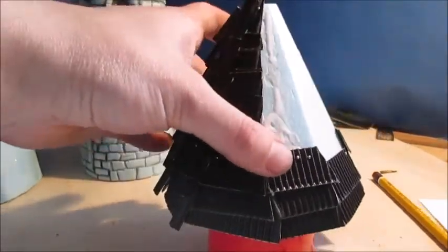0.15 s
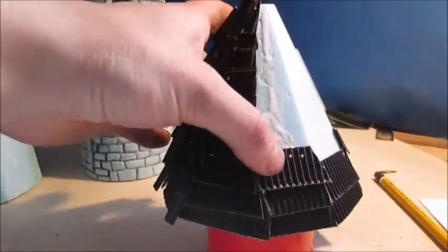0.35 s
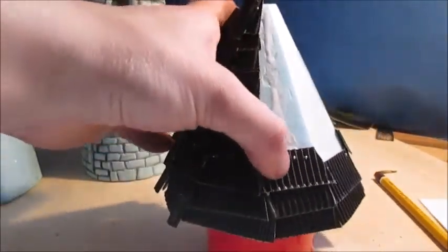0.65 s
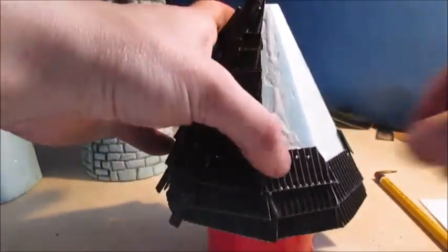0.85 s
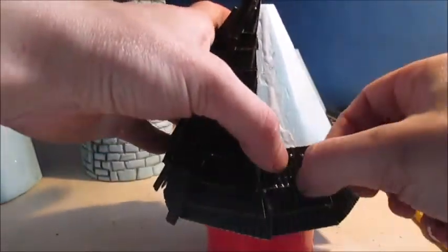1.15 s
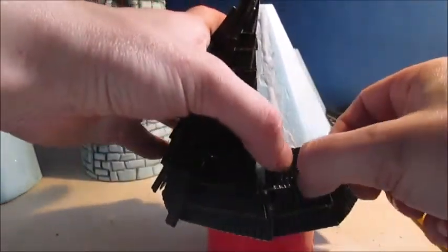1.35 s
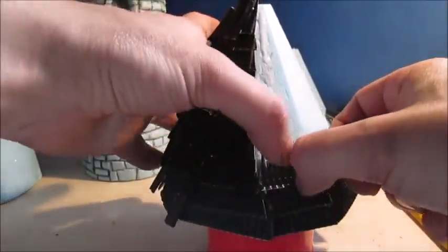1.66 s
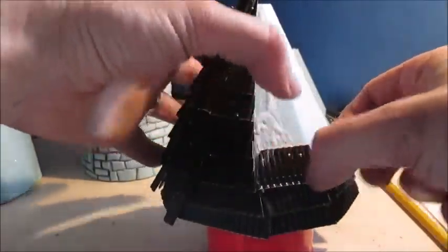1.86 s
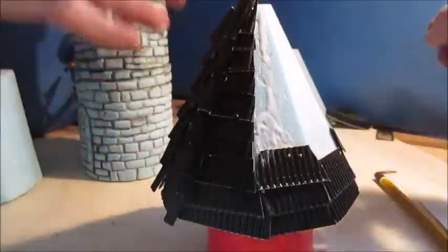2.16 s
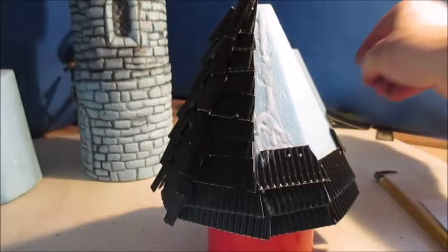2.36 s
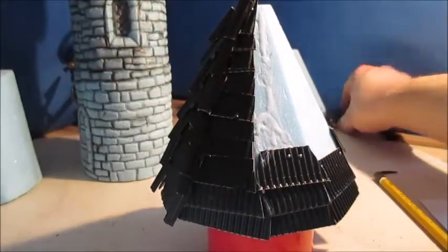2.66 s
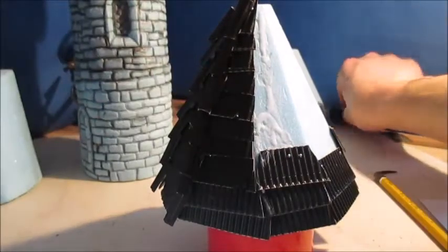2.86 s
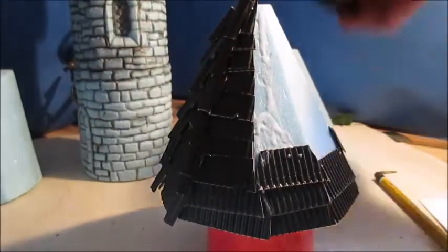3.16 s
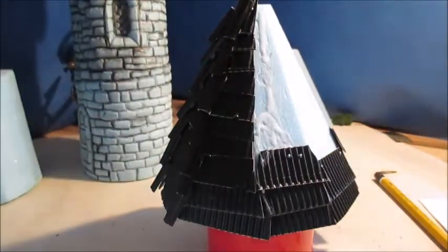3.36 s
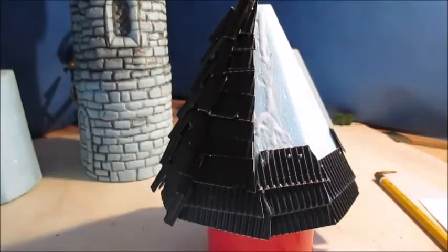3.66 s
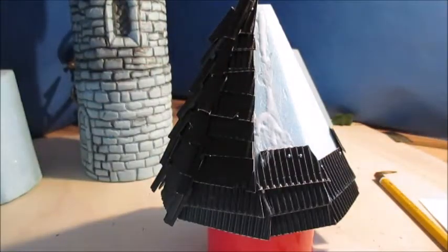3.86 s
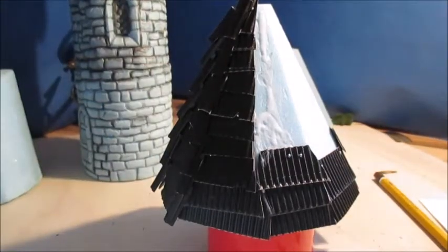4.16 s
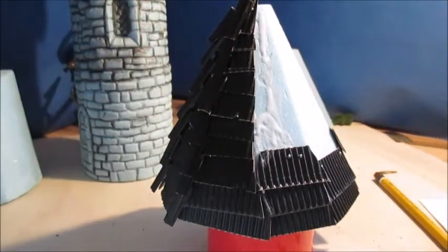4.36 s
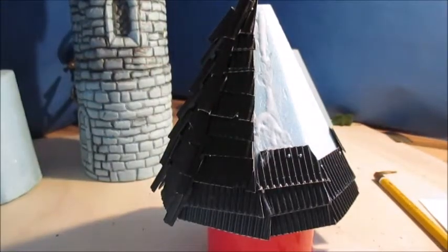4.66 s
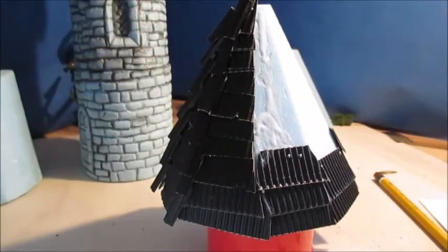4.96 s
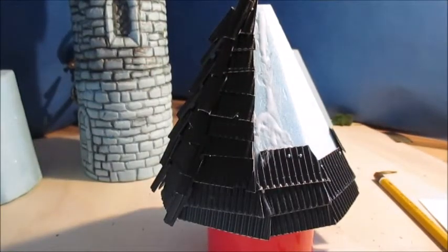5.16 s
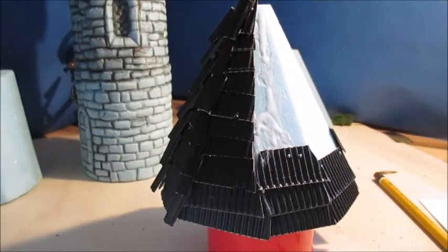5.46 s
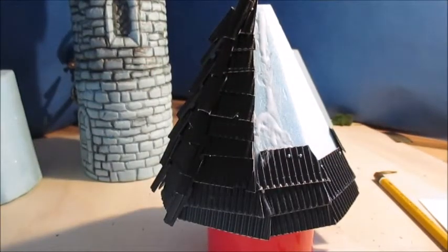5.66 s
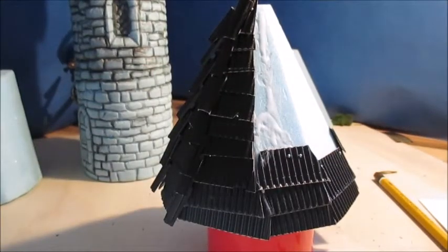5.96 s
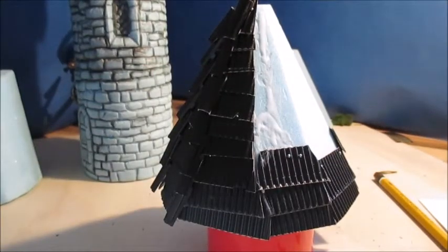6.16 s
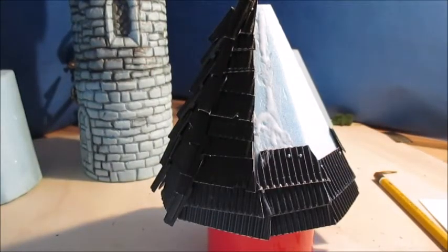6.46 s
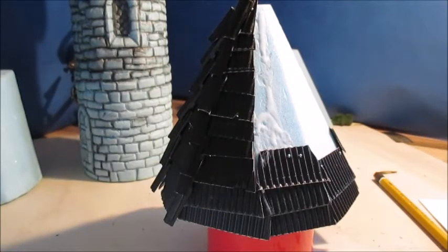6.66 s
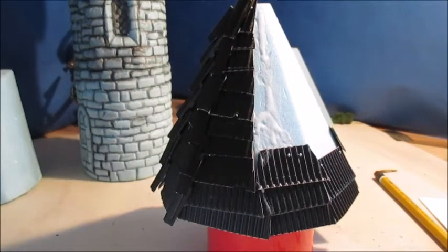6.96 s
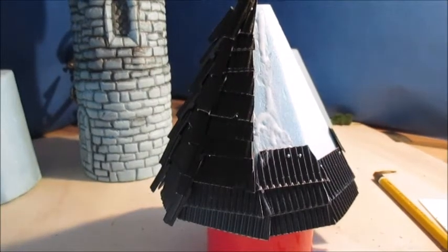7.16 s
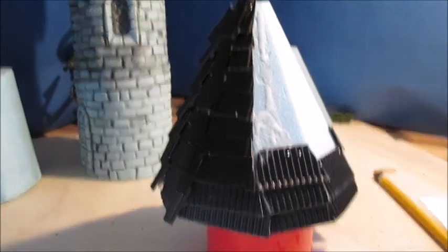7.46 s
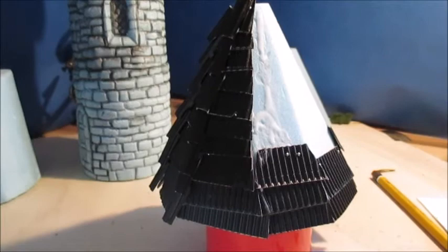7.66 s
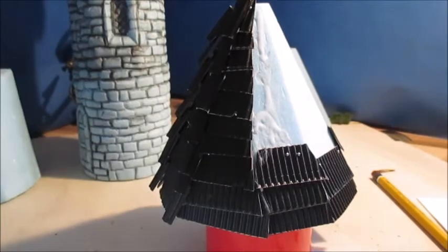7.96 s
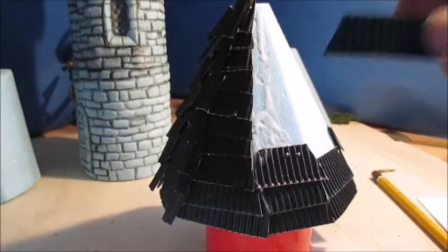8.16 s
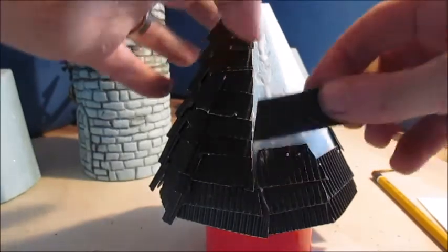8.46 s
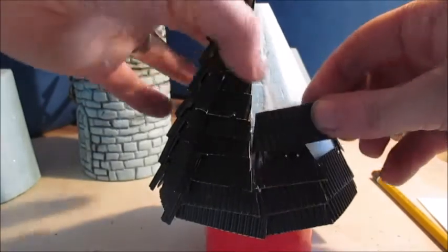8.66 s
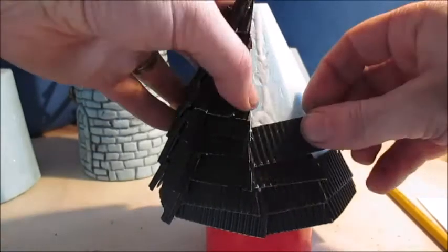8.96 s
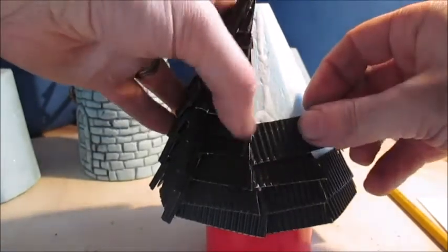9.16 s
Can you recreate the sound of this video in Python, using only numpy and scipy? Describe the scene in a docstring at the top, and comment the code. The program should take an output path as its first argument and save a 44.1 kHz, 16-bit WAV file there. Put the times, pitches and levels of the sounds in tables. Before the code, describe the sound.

A cardboard model roof is handled close by on a wooden table in a small room, over steady low hum and room noise. In the first second, small things knock and scuff on the table, with light clicks. At 1.6 seconds a pressed card shingle snaps onto the hollow roof with a short, loud pop. A cluster of knocks and rustles comes from 2.5 to 2.9 seconds, then sharp clicks around 3.6. More knocks, clicks and rustles run from 4 to 4.5 seconds, followed by a soft, dull half-second slide over the tabletop. Faint ticks and tiny card creaks lead to sharp clicks at about 6.5 seconds. A last bunch of hard knocks and scrapes falls between 6.9 and 7.5 seconds, and the volume dips briefly after the hardest blows. Light clicks and faint handling continue until just after 9 seconds.

```python
"""A cardboard and foam model roof is handled on a wooden work table in a small room.
First things knock on the table; at 1.6 s a pressed card shingle snaps onto the hollow roof with a pop.
More knocks, clicks and rustles follow, then at 4.5 s something slides softly over the table top.
Card creaks and clicks, a last bunch of knocks comes at 7-7.5 s, and faint handling ends the scene.
Mains hum and room noise lie below throughout; the volume ducks after the hardest blows."""
import sys
import numpy as np
from scipy import signal
from scipy.fft import rfft, irfft
from scipy.io import wavfile

SR = 44100
rng = np.random.default_rng(int(sys.argv[2]) if len(sys.argv) > 2 else 0)


def unload_audio(sound):
    """Save the sound as a 16-bit wav file, at the path given as the first command line argument."""
    columns = np.transpose(np.atleast_2d(sound))
    # keep every value between -1 and 1, then stretch to whole-number steps
    steps = np.round(np.clip(columns, -1, 1) * 32767)
    wavfile.write(sys.argv[1], SR, steps.astype(np.int16))


N = 410571
LENGTH, LEAD = 16384, 400  # samples in one sound, and in the crackle just before a contact
AGE = np.arange(LENGTH) / SR  # seconds since a sound began
FREQS = np.arange(LENGTH // 2 + 1) * SR / LENGTH
# A sound's tone is five levels in dB: thump, body, clack, edge and crack. These are their pitches in Hz.
TONE_HZ = [140, 600, 1500, 3400, 8000]

# An ordinary knock's tone, thump to crack, in dB.
KNOCK_TONE = [-5.5, 1, -4, -14, -29.5]
# What each dB of hardness adds to those five levels: mostly edge and crack.
HARD_SHARE = [0.028, 0.013, 0.29, 0.91, 1]
# What each dB of heaviness adds: more thump, less clack.
HEAVY_SHARE = [0.93, -0.032, -0.27, -0.028, -0.15]
# The table top's notes. Each row: pitch in Hz, level in dB, ring time in seconds.
TABLE_NOTES = [(84, 2, .2), (138, -3, .18), (228, -4, .14), (260, -3, .15), (464, -4, .11), (533, -2, .11),
               (620, -6, .06), (743, -2, .07), (927, -2, .07), (1001, -3, .06), (1162, -4, .09),
               (1248, -4, .09), (1381, -4, .07), (1672, -5, .07), (1729, -5, .09), (1851, -5, .08)]
# Each row: start in seconds, level in dB, hardness in dB, heaviness in dB, scuff in seconds,
# the thing's own pitch in Hz, boost at that pitch in dB, echo level in dB.
KNOCKS = [(0.093, 9, -7, 1, 0.0015, 1660, 11.5, 1), (0.165, -8.5, -15, 12, 0.0066, 1500, 12.5, -0.5),
          (0.3152, 0, 6, 18, 0.0013, 1920, 14.5, 0), (0.376, 10, -12, -9, 0.0036, 1100, 7, -0.5),
          (0.3973, 14, -15.5, 4, 0.0075, 282, 6, 0.5), (0.6255, -1.5, 4.5, 15, 0.0069, 805, 8, 1.5),
          (0.7125, 22, -12.5, -7, 0.002, 2720, 10, 0.5), (0.7412, 4.5, 0, 3, 0.002, 2950, 20.5, 2.5),
          (0.7517, 16.5, -22, 3.5, 0.0024, 1020, 11.5, 0), (0.818, 3.5, -3, 0, 0.002, 2800, 7.5, -6),
          (2.547, 12.5, -8, -2, 0.0034, 2700, 7.5, -3), (2.593, 4.5, 2, 3.5, 0.0098, 2000, 8, 6),
          (2.635, 5, -19, 7, 0.0021, 497, 12, -4), (2.655, 3, -0.5, -1, 0.0045, 3050, 7.5, 3),
          (2.7305, 11, -6, 1, 0.0064, 2330, 13.5, -2), (2.7378, 15.5, -10, -4, 0.002, 920, 4, 1),
          (2.766, 7.5, 1, -2, 0.0046, 4300, 10.5, 1.5), (2.796, 7, -6, 4, 0.0058, 2390, 11, -4),
          (2.828, 5.5, -8, 8.5, 0.0046, 380, 7.5, -3.5), (4.0343, 13.5, -11, 4.5, 0.0031, 812, 8, 3),
          (4.0487, 4.5, 0, 11, 0.0024, 550, 9.5, 12), (4.0657, 14, 7, -16, 0.0012, 4000, 13.5, -2.5),
          (4.069, 20.5, 4.5, 0.5, 0.002, 1150, 7, -2.5), (4.345, 1.5, -27, -2, 0.0043, 510, 10, -5),
          (4.356, 5, -24, -1, 0.0016, 580, 7, -3), (4.38, 1.5, 0, -3, 0.003, 2490, 14, 1),
          (4.4394, 7.5, -6, 5, 0.0019, 1660, 9, 0.5), (4.4635, 3.5, -15, -1, 0.0018, 680, 10, -4),
          (6.5293, 5.5, -17, -30, 0.00068, 686, 9, -10), (6.893, -5.5, -11, 14, 0.0047, 900, 2.5, 0),
          (7.0115, -5, 5.5, 7, 0.002, 7800, 25.5, -11), (7.018, 11, -14, -5.5, 0.0035, 3600, -8, 10),
          (7.0223, 15, -4.5, -16, 0.0029, 6540, 19, -8), (7.053, -10.5, 12, 35, 0.0024, 7500, 15, -4),
          (7.2109, 10.5, -17.5, -1, 0.0052, 676, -11, 0.5), (7.4429, 17, -11, -47, 0.0012, 1410, 7, 1.5),
          (7.463, 26, -1, -6, 0.0023, 825, 6, -7.5), (7.476, 16.5, 0, -1, 0.0036, 3300, 6.5, 3.5),
          (7.4938, 17.5, 0.5, -5, 0.0034, 1460, 2, -1.5)]

def knocks():
    """Things scuff the table, bump it and bounce once. Gives the direct sound and the part that echoes."""
    direct, to_room = np.zeros(N), np.zeros(N)
    for start, db, hard_db, heavy_db, scuff_s, own_hz, boost_db, echo_db in KNOCKS:
        tone = np.array(KNOCK_TONE) + db + hard_db * np.array(HARD_SHARE)
        tone += heavy_db * np.array(HEAVY_SHARE)
        bounce_delay = round(0.007 * SR * rng.uniform(.6, 1.4))
        drag = scuff_s / 0.0031  # a longer scuff chatters louder and longer
        hit, bounce = [blow(TABLE_NOTES, ring_db=-43, click_hz=3070, chatter_db=5.5 + 10 * np.log10(drag),
                            rise_s=scuff_s, fade_s=0.02 * drag) for _ in range(2)]
        contact = hit + from_db(-7.5) * np.pad(bounce, (bounce_delay, 0))[:LENGTH]
        contact = resonate(contact, hz=340, db=-0.5, q=1.9)  # the table is weak between thump and body
        contact = resonate(contact, own_hz, boost_db, q=4)
        sound = from_db(-4.5) * shape_tone(contact, tone, sub_db=-20, top_db=-31 + 0.59 * hard_db,
                                           ripple=0.19)
        sound = crackle_before(sound, db=-18, rise_s=0.0043)
        add(direct, start - LEAD / SR, sound)
        add(to_room, start - LEAD / SR, from_db(echo_db) * sound)
    return direct, to_room

# The hollow roof's notes. Each row: pitch in Hz, level in dB, ring time in seconds.
ROOF_NOTES = [(365, -13, .09), (452, -11, .06), (540, 0, .03), (615, 5, .027), (700, 2, .024),
              (830, -2, .028), (960, -1, .028), (1240, -7, .04), (2825, -3, .015), (3750, -1, .015),
              (4130, 5, .014), (4500, 4, .014), (5320, 6, .012), (9100, 4, .012)]
# Each row: start in seconds, then thump, body, clack, edge and crack in dB.
SNAPS = [(1.5917, 6, 28.5, 13, 18.5, 14)]

def shingle_snap():
    """A pressed shingle springs onto the roof, whose hollow cone gives a short pop."""
    out = np.zeros(N)
    for start, *tone in SNAPS:
        contact = blow(ROOF_NOTES, ring_db=-32.5, click_hz=9000, chatter_db=5, rise_s=0.0009, fade_s=0.02)
        sound = from_db(-11.5) * shape_tone(contact, tone, sub_db=-21, top_db=-24, ripple=0.074)
        add(out, start - LEAD / SR, crackle_before(sound, db=-21, rise_s=0.0086))
    return out

# An ordinary click's tone, thump to crack, in dB.
CLICK_TONE = [-5, -3, 0, -4, -4.5]
# Loose card's notes. Each row: pitch in Hz, level in dB, ring time in seconds.
CARD_NOTES = [(760, -2, .03), (1250, -3, .03), (1700, -2, .025), (3600, -3, .015), (5300, 2, .012),
              (7300, 2, .012), (9300, 4, .012)]
# Each row: start in seconds, level in dB, brightness in dB per octave, echo level in dB,
# the thing's own pitch in Hz, boost at that pitch in dB (a dip if negative).
CLICKS = [(0.1995, -21, -2, -8, 9000, 6), (0.2105, -19, -0.5, -6, 10000, 10),
          (0.3165, -14, -3, -4, 6500, 11), (0.6235, -10.5, 1.5, -9, 6100, 8.5),
          (0.7128, -6, -5, 1, 6200, 21), (0.7415, -12, -5.5, 2, 5200, 16),
          (0.7625, -11.5, -3, -6, 6600, 13.5), (0.903, -9, -5, -1, 9500, 9.5),
          (1.435, -23, -0.5, -5, 4000, 4), (2.785, -1.5, -3.5, 4, 8500, 0), (3.5036, -2, -3, -5.5, 1500, 3),
          (3.598, -12, -3, -2.5, 3000, 7), (3.7228, -0.5, -3.5, -5, 1500, -3),
          (4.053, -8.5, 3.5, 0, 10600, -2), (4.0615, -11, -2.5, -5, 10000, 1),
          (4.1455, -10, -5, -3, 7600, 18), (4.249, -16.5, -1.5, -4, 8800, 20),
          (4.3332, -8.5, -2, 4.5, 2520, 8), (4.3815, -9, -6, 1.5, 4600, 21.5),
          (5.0195, -22.5, -5, -1, 2430, 21.5), (6.0975, -11, 6, 2.5, 2450, 6.5),
          (6.4436, 8, 0.5, -3, 4340, -14), (6.4624, 4, -1.5, -26, 4000, -14), (6.5043, -3, 2, -4, 2500, 7),
          (6.527, -6, 1, -8, 2220, 13), (6.5296, 3, 2.4, -5.5, 2500, 5), (7.3112, -3, -5, -13, 9600, 9),
          (7.464, 1.5, -1.5, -1, 9630, 10), (7.8728, -10, -5, -9.5, 9400, 8.5),
          (7.878, 1.5, -1.5, -12, 10800, 11.5), (8.0478, -21.5, 2.5, -14, 9000, 9),
          (8.2233, -12, -2.5, -13, 4000, -3), (8.583, -31, -2, -10, 3000, 17),
          (8.684, -18, -2, 5.5, 8500, 5.5), (8.79, -17.5, 0, 0, 6000, -2.5),
          (8.869, -19, -2.5, -7, 2540, 14), (9.192, -25.5, -2.5, -8, 5600, 17.5)]

def card_clicks():
    """Card and small tools click sharply. Gives the direct sound and the part that echoes."""
    direct, to_room = np.zeros(N), np.zeros(N)
    for start, db, brightness, echo_db, own_hz, boost_db in CLICKS:
        tone = tilt(CLICK_TONE, db, brightness)
        contact = blow(CARD_NOTES, ring_db=-58.5, click_hz=14700, chatter_db=-1.5,
                       rise_s=0.00028, fade_s=0.019)
        # the walls get the click from all its sides, so theirs starts as a plain pulse
        pulse = from_db(echo_db + 3.5) * signal.unit_impulse(LENGTH)
        for track, source in (direct, contact), (to_room, pulse):
            sound = from_db(-3.5) * shape_tone(source, tone, sub_db=-27, top_db=-14, ripple=0.84)
            sound = resonate(sound, own_hz, boost_db, q=3)
            add(track, start - LEAD / SR, crackle_before(sound, db=-5, rise_s=0.00051))
    return direct, to_room

# An ordinary rustle's tone, thump to crack, in dB.
RUSTLE_TONE = [-5, 1, -2, -11.5, -14.5]
# Each row: start, end and swell time in seconds, level in dB, brightness in dB per octave,
# highest treble in dB compared with the crack.
RUSTLES = [(0.165, 0.172, 0.0027, -47, 5, -10), (0.208, 0.24, 0.0025, -43.5, 4, -8),
           (0.303, 0.335, 0.0095, -26, -2.5, -20), (0.567, 0.61, .008, -40, -0.5, -20),
           (0.617, 0.627, .004, -29.5, 0, -5), (0.688, 0.73, .01, -45, -2, -20),
           (0.99, 1.06, 0.012, -38, -2, -22), (2.54, 2.605, 0.0067, -25, 0, -19),
           (2.592, 2.72, 0.0037, -29.5, -3.5, -14), (2.74, 2.865, 0.0055, -32, -0.5, -26),
           (3.22, 3.25, 0.0063, -45, 5, -6), (3.35, 3.37, .004, -45, 2, -21),
           (3.492, 3.505, .004, -43.5, 9, -18), (3.66, 3.69, .008, -47, 5, -12),
           (4.079, 4.17, .004, -26.5, -1.2, -37), (4.241, 4.305, 0.0047, -29, -0.7, -7),
           (4.331, 4.385, .004, -29, -3.5, -17), (4.44, 4.47, .004, -26.5, -2.2, -24),
           (4.855, 4.88, 0.011, -50, 3.5, -22), (5.009, 5.035, .008, -40.5, 4, -14),
           (5.385, 5.425, 0.0039, -45, 2, -22), (5.731, 5.742, 0.0026, -45, 5.5, -30),
           (5.768, 5.79, .004, -48, 6, -25), (6.073, 6.1, 0.0062, -43, 4, -26),
           (6.225, 6.236, .004, -45.5, 2.5, -24), (6.881, 6.925, .02, -30.5, -0.7, -22),
           (7.015, 7.058, 0.0067, -21.5, 1.9, -19), (7.14, 7.18, 0.0031, -36.5, 1.5, -4),
           (7.24, 7.312, 0.053, -35, 0, -13), (7.382, 7.44, 0.029, -28.5, -4, -28),
           (7.413, 7.475, .03, -23.5, -4, -22), (7.96, 7.982, 0.014, -43, 4, -7),
           (8.135, 8.158, 0.012, -44, 6, -21), (8.816, 8.838, .008, -44, 3, -24.5)]

def rustles():
    """Rough surfaces catch and slip: tiny crackles over a fine hiss swell with each stroke."""
    out = np.zeros(N)
    for start, end, swell_s, db, brightness, top_db in RUSTLES:
        swell = np.clip(AGE / swell_s, 0, 1)
        fade = np.exp(-np.maximum(AGE - (end - start), 0) / 0.016)
        # the grip changes every few milliseconds, so the crackles come in clumps
        grip = from_db(np.interp(AGE, np.linspace(0, AGE[-1], 70), rng.uniform(-4, 3, 70)))
        hiss = unit_energy(rng.standard_normal(LENGTH))
        friction = np.sqrt(LENGTH) * unit_energy(fibres(per_s=8200, spread_db=2, count=14) + .5 * hiss)
        stroke = friction * grip * swell * fade
        tone = tilt(RUSTLE_TONE, db + 1.5, brightness)
        add(out, start, shape_tone(stroke, tone, sub_db=0, top_db=top_db, ripple=0.46))
    return out

def fibres(per_s, spread_db, count):
    """Fibres let go at random, each ringing briefly at one of `count` pitches."""
    pitches = np.geomspace(700, 14000, count)
    sizes = from_db(spread_db * np.minimum(rng.exponential(1, LENGTH), 4)) * rng.choice([-1, 1], LENGTH)
    clicks = sizes * (rng.random(LENGTH) < per_s / SR)
    band_of_click = rng.integers(0, count, LENGTH)
    rings = [rfft(unit_energy(clicks * (band_of_click == k))) * np.sqrt(at_hz(pitches, share, FREQS))
             for k, share in enumerate(np.eye(count))]
    return irfft(sum(rings))

# Each row: start in seconds, length in seconds, level in dB, pitch in Hz.
CREAKS = [(5.016, 0.0092, -39, 3550), (5.764, 0.027, -48.5, 2730), (8.661, 0.0058, -54, 2280),
          (8.677, 0.0097, -53, 2610), (8.679, 0.013, -51, 4500), (8.893, .008, -52, 2250)]

def card_creaks(slips_per_s=1000):
    """Stiff card sticks and slips unevenly; each slip rings a low note and a weaker high one."""
    out = np.zeros(N)
    for start, length, db, hz in CREAKS:
        gaps = rng.uniform(.4, 1.6, 64)
        slip_samples = np.minimum(np.cumsum(gaps) * SR / slips_per_s, LENGTH - 1).astype(int)
        slips = np.zeros(LENGTH)
        slips[slip_samples] = gaps  # a longer wait gives a bigger slip
        slips *= np.sqrt(np.abs(np.sin(np.pi * np.minimum(AGE / length, 1))))
        low, high = [unit_energy(signal.lfilter(*signal.iirpeak(pitch, Q=10, fs=SR), slips + 1e-18))
                     for pitch in (hz, hz * 1.35)]
        add(out, start, from_db(db) * np.sqrt(length * SR) * (low + from_db(-9.5) * high))
    return out

# The slide's tone. Each row: pitch in Hz, relative level in dB.
SLIDE_SPECTRUM = [(60, -33), (230, -2), (420, -7.5), (700, -17), (1400, -23), (1900, -16.5), (2600, -20.5),
                  (3400, -31.5), (8000, -32), (16000, -50)]

def table_slide(start=4.49, end=4.99, db=-48, fade_db_per_s=7, ramp_s=0.0073, wobble_db=0):
    """Something is drawn softly over the table; its dull rubbing fades as it slows."""
    age = np.arange(N) / SR - start
    rubbing = shaped_noise(SLIDE_SPECTRUM)
    moving = np.clip(np.minimum(age, end - start - age) / ramp_s, 0, 1)
    # with wobble_db at 0 the slide is perfectly even
    wobble = wobble_db * np.interp(age, np.linspace(0, end - start, 36), rng.standard_normal(36))
    return rubbing * moving * from_db(db + wobble - fade_db_per_s * np.maximum(age, 0))

# The room's echo. Each row: pitch in Hz, seconds to fade by 60 dB, level in dB.
ECHO_BANDS = [(99, 0.35, 0), (310, 0.28, -5), (1000, 0.24, -6.5), (3000, 0.2, -7.5), (8000, 0.16, -9.5),
              (16000, 0.2, -13.5)]

def room_echo(sound, build_up_s=0.0045):
    """Wall echoes die away band by band; their pattern keeps changing, as when hands move about."""
    pitches, fade_times, levels = np.transpose(ECHO_BANDS)
    onset = 1 - np.exp(-(AGE / build_up_s) ** 2)
    bands = np.array([at_hz(pitches, share, FREQS) for share in np.eye(len(pitches))])
    decays = np.array([from_db(db) * unit_energy(onset * dying(s)) for s, db in zip(fade_times, levels)])
    hop = LENGTH // 2
    crossfade = np.sin(np.pi * np.arange(LENGTH) / LENGTH)
    padded, out = np.pad(sound, (hop, LENGTH)), np.zeros(N + 3 * LENGTH)
    for i in range(0, N + hop, hop):
        band_noise = irfft(rfft(rng.standard_normal(LENGTH)) * bands)
        tail = np.sum(band_noise * decays, axis=0)
        out[i:i + 2 * LENGTH - 1] += signal.fftconvolve(padded[i:i + LENGTH] * crossfade, tail)
    return out[hop:hop + N]

# The room noise's tone. Each row: pitch in Hz, relative level in dB.
NOISE_SPECTRUM = [(15, -43), (28, -8.5), (58, -9.5), (85, -9.5), (120, -7.5), (170, -15), (290, -12.5),
                  (400, -18), (680, -20.5), (820, -17.5), (1100, -23.5), (2200, -29.5), (3200, -28.5),
                  (3900, -35), (8000, -37), (16000, -47)]
# Each row: pitch in Hz, average level in dB.
MAINS_HUM = [(120, -53.5)]

def noise_and_hum():
    """Steady room noise and a slightly wavering mains hum."""
    t = np.arange(N) / SR
    noise = from_db(-51.5) * shaped_noise(NOISE_SPECTRUM)
    waver_db = -1.5 * np.interp(t, np.linspace(0, t[-1], 40), rng.standard_normal(40))
    hum = sum(np.sqrt(2) * from_db(db) * np.sin(2 * np.pi * (hz * t + rng.random()))
              for hz, db in MAINS_HUM)
    return noise + hum * from_db(waver_db)

def blow(notes, ring_db, click_hz, chatter_db, rise_s, fade_s):
    """One contact: the surfaces chatter briefly, there is a soft-edged click, and the notes ring."""
    swell = 1 - np.exp(-AGE / rise_s)
    chatter = from_db(chatter_db) * unit_energy(rng.standard_normal(LENGTH) * swell * dying(fade_s))
    click = np.exp(-2 * np.pi * click_hz * AGE)
    out = chatter + click / click.sum()
    for hz, db, ring_s in notes:
        out += rng.uniform(.6, 1.3) * from_db(ring_db + db) * np.cos(2 * np.pi * hz * AGE) * dying(ring_s)
    return out

def crackle_before(sound, db, rise_s):
    """Surfaces crackle as they give way; the contact itself comes LEAD samples later."""
    time_left = np.arange(LEAD, 0, -1) / SR
    crackle = unit_energy(rng.standard_normal(LEAD) * np.exp(-time_left / rise_s))
    return signal.fftconvolve(sound, np.append(from_db(db) * crackle, 1))

def shape_tone(sound, tone, sub_db, top_db, ripple):
    """Filter a sound to its five tone levels; sub_db and top_db set the deepest and highest ends."""
    thump, body, clack, edge, crack = tone
    pitches = [25, 65] + TONE_HZ[:3] + [1900, 2300] + TONE_HZ[3:] + [10000, 16000]
    levels = [thump + sub_db, thump, thump, body, clack, .85 * clack + .15 * edge,
              .35 * clack + .65 * edge, edge, crack, crack - 2, crack + top_db]
    # every spot that is touched has treble peaks and dips of its own
    spot_db = at_hz(np.geomspace(1400, 15000, 20), np.append(0, rng.uniform(-4.5, 3.5, 19)), FREQS)
    gains = from_db(at_hz(pitches, levels, FREQS) + ripple * spot_db)
    # a minimum-phase filter: nothing rings before the hit
    cepstrum = irfft(np.log(gains))
    cepstrum[1:LENGTH // 2] *= 2
    cepstrum[LENGTH // 2 + 1:] = 0
    response = irfft(np.exp(rfft(cepstrum)))
    return signal.fftconvolve(sound, response)[:LENGTH]

def tilt(tone, db, db_per_octave):
    """Raise five tone levels by db and tip them brighter or duller around the clack."""
    return np.array(tone) + db + db_per_octave * np.log2(np.array(TONE_HZ) / TONE_HZ[2])

def resonate(sound, hz, db, q):
    """Boost or lower the band around one pitch; a higher q makes it narrower."""
    return sound + (from_db(db) - 1) * signal.lfilter(*signal.iirpeak(hz, q, fs=SR), sound)

def shaped_noise(spectrum):
    """Scene-long noise with the given tone and an average power of one."""
    gains = from_db(at_hz(*np.transpose(spectrum), np.arange(N // 2 + 1) * SR / N))
    return np.sqrt(N) * unit_energy(irfft(rfft(rng.standard_normal(N)) * gains, N))

def from_db(db):
    """Decibels to gain."""
    return 10 ** (np.asarray(db) / 20)

def unit_energy(sound):
    """Scale to a total energy of one."""
    return sound / np.sqrt(np.sum(sound ** 2) + 1e-20)

def at_hz(pitches, values, hz):
    """Read between listed pitches, with octaves evenly spaced."""
    return np.interp(np.log(np.maximum(hz, 1)), np.log(pitches), values)

def add(out, start_s, sound):
    """Mix a sound in at a time."""
    start = max(round(start_s * SR), 0)
    out[start:start + len(sound)] += sound[:N - start]

def dying(seconds):
    """A fade that falls 60 dB in this time."""
    return np.exp(-np.log(1000) * AGE / max(seconds, 1e-4))

def scene():
    """The roof is close by; the table sounds lie a little farther off."""
    background = noise_and_hum()
    pop = shingle_snap()
    bumps, bumps_to_room = knocks()
    friction = table_slide() + card_creaks() + rustles()
    clicks, clicks_to_room = card_clicks()
    # the small roof sends little of its low pop into the room
    pop_to_room = signal.sosfilt(signal.butter(2, 700, "high", fs=SR, output="sos"), pop)
    echo = room_echo(bumps_to_room + friction + from_db(5.5) * clicks_to_room + from_db(-2) * pop_to_room)
    return (bumps + friction + clicks + pop + echo + background)[None]

def gain_control(sound, threshold_db, release_db_per_s, attack_s):
    """Peaks over the threshold turn the volume down; it creeps back up."""
    recovery_db = release_db_per_s * np.arange(N) / SR
    over_db = np.maximum(20 * np.log10(np.abs(sound) + 1e-9) - threshold_db, 0)
    held_db = np.maximum.accumulate(over_db + recovery_db, axis=-1) - recovery_db
    smoothing = np.exp(-1 / (attack_s * SR))
    return sound * from_db(-signal.lfilter([1 - smoothing], [1, -smoothing], held_db))

def record(dry):
    """Duck after loud peaks, clip at full scale and cut the treble above 16.1 kHz."""
    ducked = gain_control(dry, threshold_db=-6, release_db_per_s=14.5, attack_s=0.24)
    treble_cut = signal.ellip(12, .1, 100, 16100, fs=SR, output="sos")
    return signal.sosfilt(treble_cut, np.clip(ducked, -1, 1))

dry = scene()
out = record(dry)
unload_audio(out)
```